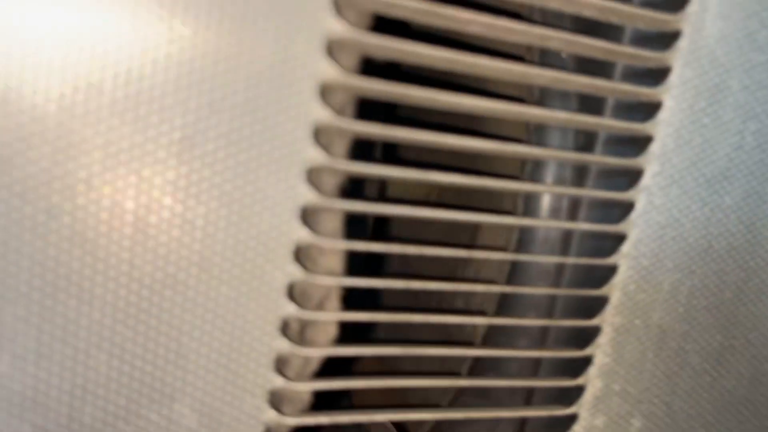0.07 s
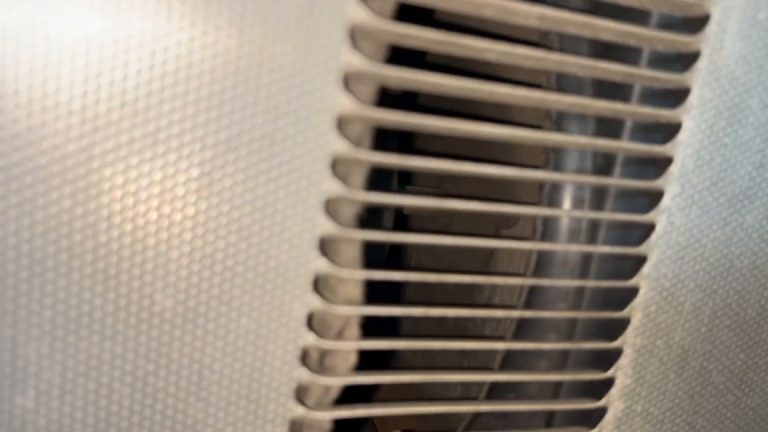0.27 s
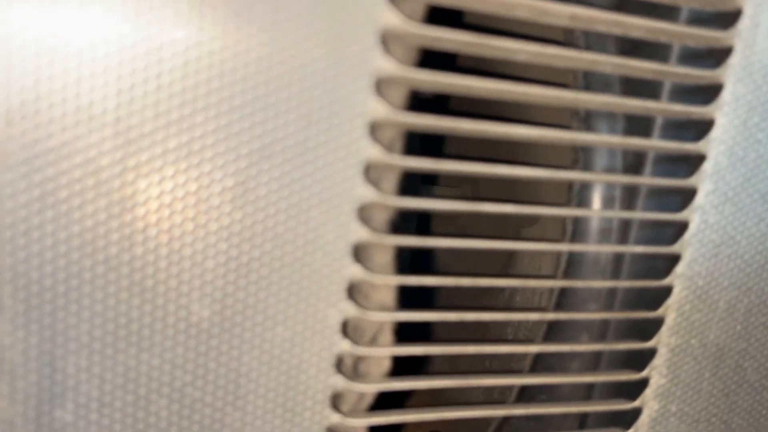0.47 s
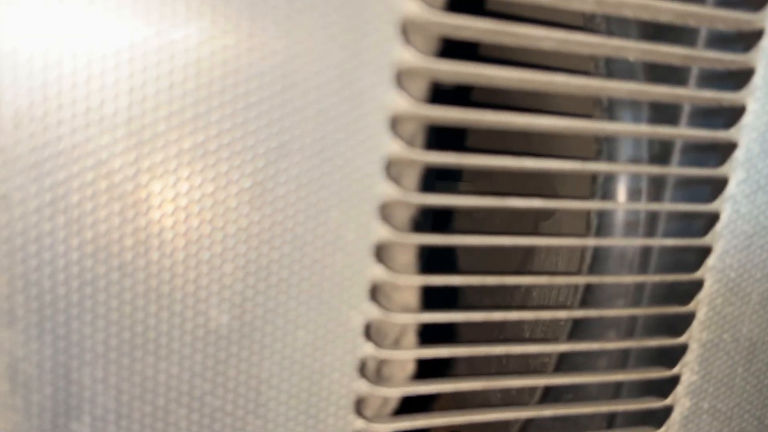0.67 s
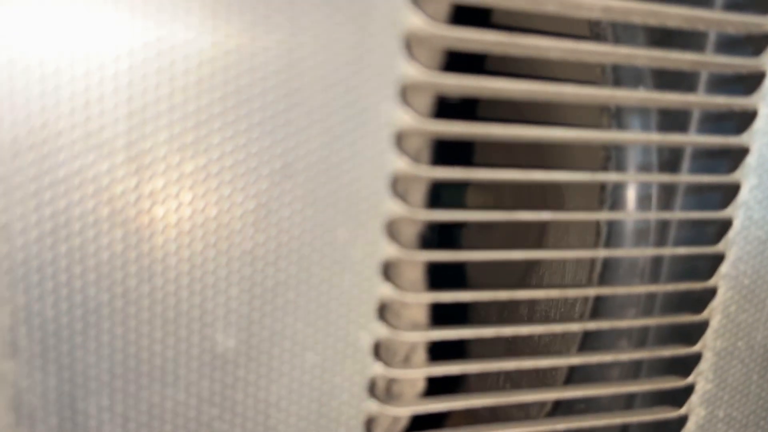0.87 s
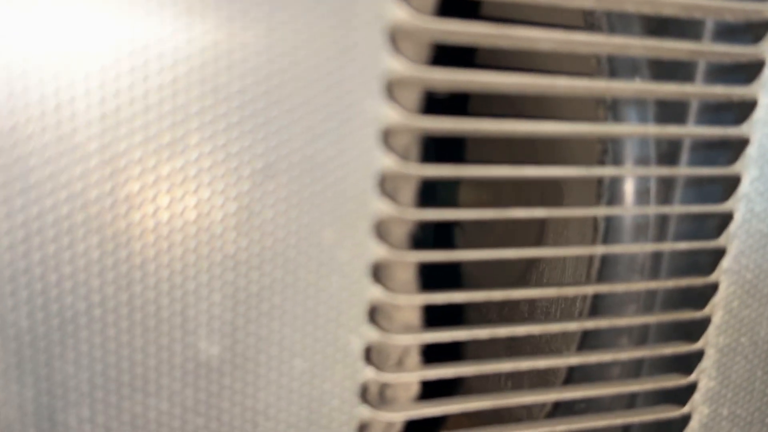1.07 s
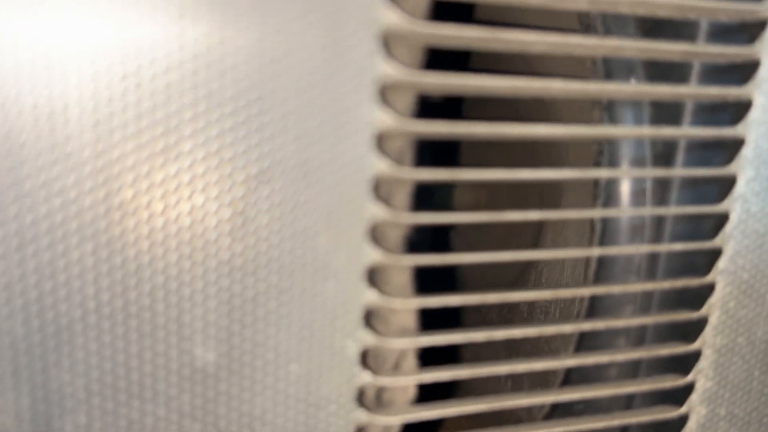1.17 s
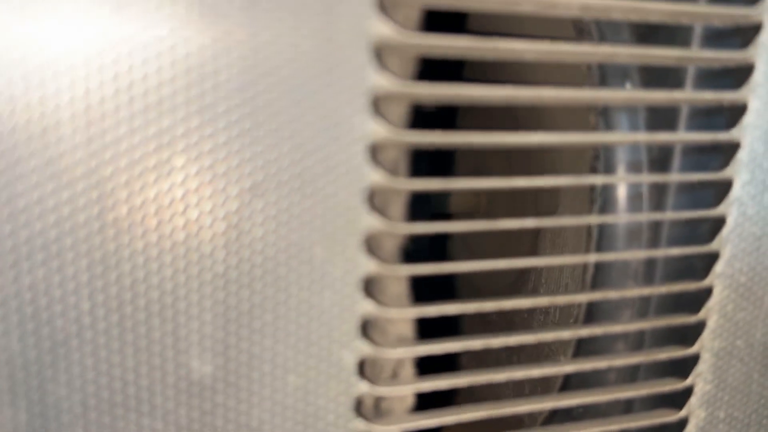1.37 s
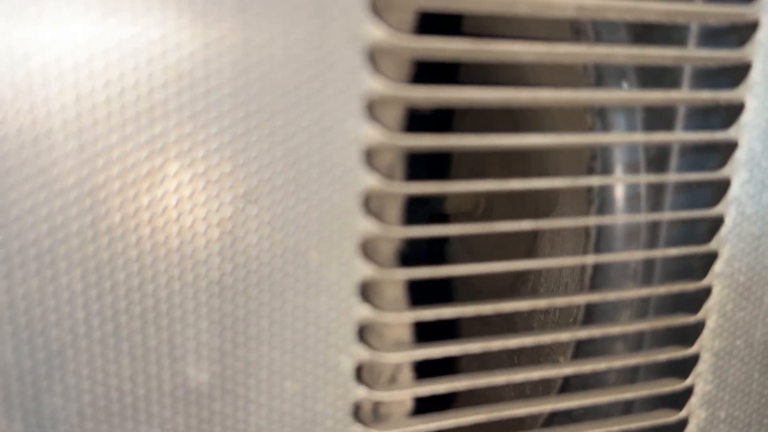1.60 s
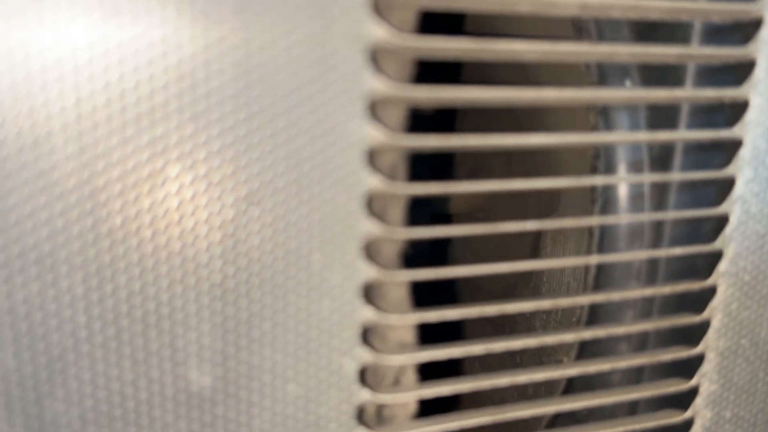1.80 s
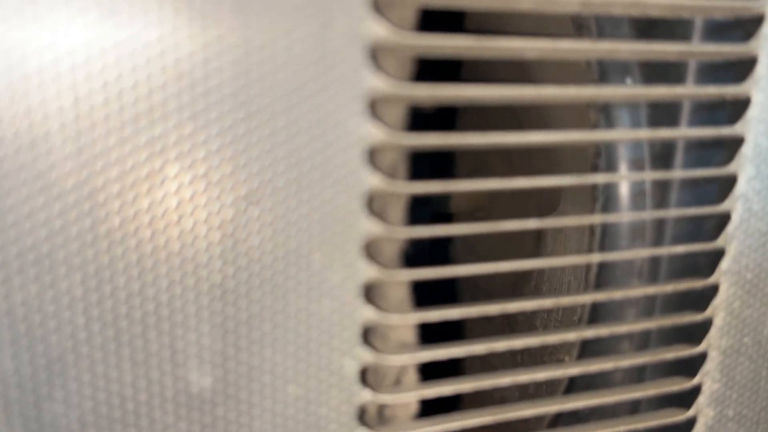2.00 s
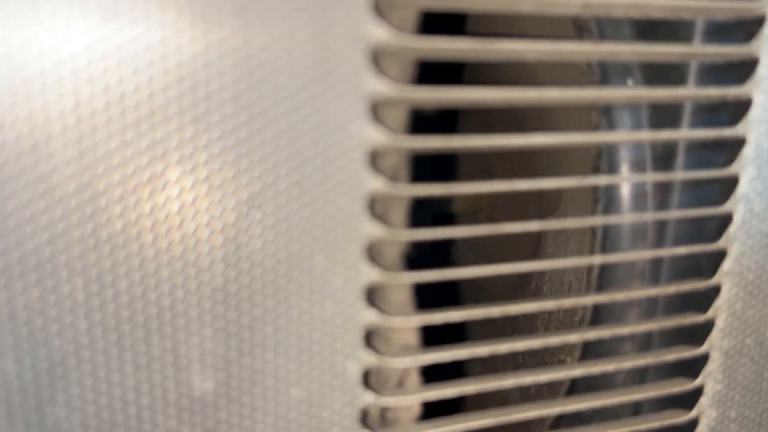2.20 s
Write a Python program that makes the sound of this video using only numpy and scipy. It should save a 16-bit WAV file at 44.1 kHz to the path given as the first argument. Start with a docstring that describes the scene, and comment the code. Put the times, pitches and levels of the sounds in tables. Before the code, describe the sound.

Close to an air conditioner in a small room, a humming rush of air swells and hisses through the vent slots. One sharp switch clunk follows with a short echo, and the airflow fades away.

```python
"""An air conditioner's blower spins up close by and pushes air out through its grille.
The air rumbles in the fan housing, roars and puffs in the duct, makes the cabinet hum
and hisses through the slots. A switch clunks as its contacts snap and knock a panel.
The small room rings briefly, and the fan winds down to a faint hiss."""
import sys
import numpy as np
from scipy import signal
from scipy.fft import rfft, irfft
from scipy.io import wavfile
from scipy.ndimage import uniform_filter1d

SR = 44100
rng = np.random.default_rng(int(sys.argv[2]) if len(sys.argv) > 2 else 0)


def master_out(mix):
    """Clip the mix to full scale and print it as 16-bit PCM to the path in sys.argv[1]."""
    frames = np.transpose(np.atleast_2d(mix))
    ceiling = np.clip(frames, -1, 1)
    pcm = np.round(ceiling * 32767).astype(np.int16)
    wavfile.write(sys.argv[1], SR, pcm)


N = 99225
TIME = np.arange(N) / SR

# How strongly the air flows: time_s, level_db
AIR_FLOW = [(0, -26), (.05, -25), (.14, -18), (.25, -9.5), (.36, -6), (.5, -1.5), (.7, 0), (1.0, 1),
            (1.27, 1.5), (1.37, -4.5), (1.5, -10), (1.62, -13.5), (1.85, -18.5), (2.05, -24), (2.25, -28)]
def blower(flutter_db=1.2, flutter_hz=45):
    """The fan moves the air; the same swirls make both the roar and the hiss flutter."""
    flow_db = curve(AIR_FLOW)
    swirl_db = flutter_db * resonance(0, flutter_hz)
    low_rush = housing_rumble() + duct_roar(flow_db, swirl_db) + cabinet_hum(flow_db) + duct_puffs()
    return low_rush + grille_hiss(swirl_db) + grille_fizz(flow_db)


# How the rumble rises and falls: time_s, level_db
RUMBLE_LEVEL = [(0, -24.5), (.1, -22), (.17, -11), (.25, -9.5), (.305, -13.5), (.355, -1), (.44, -0.5),
                (.49, 1), (.56, 0.5), (.66, -7), (.75, -0.5), (.96, 0.5), (1.12, 2), (1.27, -2), (1.47, -1),
                (1.53, -6.5), (1.79, -10.5), (1.84, -13.5), (2.02, -15.5), (2.055, -10.5), (2.09, -18.5),
                (2.25, -21.5)]
# The rumble's tone, or how strong each pitch is: pitch_hz, level_db
RUMBLE_TONE = [(20, -46), (35, -40), (48, -13), (62, -1.5), (84, 1.5), (125, -1), (175, -0.5), (230, -7.5),
               (340, -13.5), (900, -60.5)]
def housing_rumble(gain_db=-29):
    """Air beats against the fan housing and makes a low rumble."""
    return amp(gain_db + curve(RUMBLE_LEVEL)) * steady(noise(RUMBLE_TONE))


# The roar's tone: pitch_hz, level_db
ROAR_TONE = [(40, -43), (110, -12), (185, -1.5), (235, -4.5), (285, -1.5), (335, -11.5), (420, -8.5),
             (470, -5.5), (540, -2.5), (620, -1.5), (700, -11.5), (800, -11.5), (865, -7), (1120, -11),
             (1250, -14), (1400, -22), (2000, -34.5), (5000, -72)]
def duct_roar(flow_db, swirl_db, gain_db=-26):
    """Swirling air roars in the duct, louder as the flow grows."""
    return amp(gain_db + flow_db + swirl_db) * noise(ROAR_TONE)


# Pitches the cabinet rings at: pitch_hz, width_hz, level_db, loudest_s, swell_s
CABINET_RINGS = [(142, 34, -33.5, 0.98, 0.17), (170.4, 11.6, -29, 0.833, 0.15), (184, 27, -30, 1.303, 0.15),
                 (254.6, 24.4, -32.5, 1.13, 0.23), (426, 81, -35.5, 1.47, 0.55),
                 (544, 37, -35.5, 1.156, .17), (613, 54, -37.5, 0.71, 0.2), (866, 30, -41, 0.7, 0.16),
                 (960, 56, -39, 0.67, 0.96), (1029, 34, -41.5, 1, 0.4), (1134, 32, -38.5, .8, 0.26)]
def cabinet_hum(flow_db):
    """The cabinet hums with the flow; each pitch swells as the listener moves past it."""
    return amp(flow_db) * sum(amp(db) * swell(loudest_s, swell_s) * steady(resonance(hz, width_hz))
                              for hz, width_hz, db, loudest_s, swell_s in CABINET_RINGS)


# Single puffs of air: start_s, level_db, fade_s
AIR_PUFFS = [(0.031, -39.5, 0.046), (0.078, -36.5, 0.041), (0.337, -25, 0.014), (0.846, -27, 0.019),
             (0.986, -25.5, 0.037), (1.09, -21.5, .022), (1.176, -28, 0.017), (1.237, -19.5, 0.022),
             (1.574, -28, 0.017)]
# The tone they share: pitch_hz, level_db
PUFF_TONE = [(50, -31), (120, -13), (185, 3.5), (260, 1.5), (380, -6), (550, -1.5), (640, -14.5),
             (800, -31), (2000, -49), (8000, -100)]
def duct_puffs(rise_s=0.0035):
    """Separate puffs of air thump softly in the duct."""
    loudness = sum(amp(db) * burst(start_s, fade_s, rise_s) for start_s, db, fade_s in AIR_PUFFS)
    return loudness * steady(noise(PUFF_TONE))


# How the grille's hiss rises and falls: time_s, level_db
GRILLE_LEVEL = [(0, -13.5), (.07, -34), (.16, -19), (.28, -9.5), (.45, -2.5), (.63, 1.5), (.85, -.5),
                (1.2, 0.5), (1.33, -1), (1.48, -15.5), (1.58, -14), (1.75, -21), (2.0, -23.5), (2.25, -41)]
# The tone of that hiss: pitch_hz, level_db
GRILLE_TONE = [(300, -4), (1200, -0.5), (1600, -2), (1900, -3.5), (2300, -2), (2900, -6), (4300, -8),
               (5500, -11.5), (7200, -15), (8000, -19.5), (9500, -29), (11500, -33), (16000, -42)]
# Pitches the slots ring at: pitch_hz, width_hz, level_db
SLOT_RINGS = [(1710, 160, -51.5), (2053, 82, -58.5), (2560, 160, -55.5), (3160, 110, -57.5),
              (3790, 230, -60), (4935, 80, -63.5)]
def grille_hiss(swirl_db, hiss_db=-44):
    """Air hisses through the slots and makes them ring."""
    slots = sum(amp(db) * resonance(hz, width_hz) for hz, width_hz, db in SLOT_RINGS)
    hiss = amp(hiss_db) * noise(GRILLE_TONE)
    return amp(curve(GRILLE_LEVEL) + 0.5 * swirl_db) * (hiss + slots)


# The tone of the finest, highest hiss: pitch_hz, level_db
FIZZ_TONE = [(3000, -22), (7700, -2), (8700, 6), (10000, 0.5), (10800, -2), (12800, -2), (13700, 0),
             (16000, -11)]
def grille_fizz(flow_db, gain_db=-63):
    """Air fizzes in the grille only at full flow: it gains 2 dB for each dB of flow."""
    return amp(gain_db + 2 * flow_db) * noise(FIZZ_TONE)


# The contacts hitting home: start_s, level_db, fade_s
CONTACT_HITS = [(1.3966, -48, 0.0015), (1.398, -26.5, 0.0023), (1.399, -36, 0.002)]
# The tone of their snap: pitch_hz, level_db
SNAP_TONE = [(100, -22), (1000, -7), (3000, -4), (6000, -2), (7500, -11), (10000, 1), (12500, -1.5),
             (14200, -7), (16000, -11)]
def switch_snap(rise_s=0.00048):
    """The switch's contacts hit so close together that they make one bright snap."""
    loudness = sum(amp(db) * burst(start_s, fade_s, rise_s) for start_s, db, fade_s in CONTACT_HITS)
    return loudness * noise(SNAP_TONE)


KNOCK_S = 1.3995
# The tone of the knock on the panel: pitch_hz, level_db
KNOCK_TONE = [(40, -30), (100, 7), (300, -2), (700, -23), (1000, 6), (1400, 3.5), (2400, -2), (3200, -2.5),
              (4000, -3), (4700, -5), (6000, -9.5), (8000, -12), (16000, -32)]
# Pitches the panel rings at: pitch_hz, level_db, ring_s (time to fade by 60 dB)
PANEL_RINGS = [(995, -22.5, 0.07), (1584, -36.5, 0.1), (2320, -36, 0.11), (2600, -28.5, 0.022),
               (2765, -39.5, 0.16), (3520, -34.5, .07), (3920, -30, 0.027), (4500, -25, 0.026),
               (6700, -32, .025), (9860, -30, 0.023)]
def panel_clunk(knock_db=-22, push_db=-14.5, push_s=1.3993, push_width_s=0.0019):
    """The switch knocks a panel, which bends, pushes the air once and rings."""
    knock = amp(knock_db) * noise(KNOCK_TONE) * burst(KNOCK_S, fade_s=0.0043, rise_s=0.00068)
    push_shape = 1 - 2 * ((TIME - push_s) / push_width_s) ** 2
    push = amp(push_db) * push_shape * swell(push_s, push_width_s)
    ring = np.zeros(N)
    for hz, db, ring_s in PANEL_RINGS:
        loudness = amp(db) * burst(KNOCK_S, fade_s=ring_s / np.log(1000), rise_s=0.0015)
        ring += loudness * np.sin(2 * np.pi * (hz * TIME + rng.random()))
    return knock + push + ring


# The tone of the room's echo: pitch_hz, level_db
ECHO_TONE = [(40, -32), (100, -13), (300, 10.5), (550, 13), (750, 8), (1000, -1), (1600, 5.5), (1950, -0.5),
             (2650, 4.5), (3200, -4), (3550, 1), (3900, -1.5), (4600, 1.5), (5400, -5.5), (6000, -1),
             (7400, -7), (8300, -8), (10500, -5), (11000, -8), (12200, -5), (13200, -10), (14200, -3),
             (16000, -18)]
# How long the echo takes to fade by 60 dB: pitch_hz, ring_s
ROOM_RING_TIMES = [(100, 0.94), (1000, 0.39), (4000, 0.38), (8000, .31), (12000, 0.26), (16000, 0.24)]
def room_echo(gain_db=-31, rise_s=0.0049):
    """The clunk bounces around the room in a quick blur; the high pitches die first."""
    hz, time_s, bands = signal.stft(noise(ECHO_TONE), SR, nperseg=256)
    fade_db = -60 * np.maximum(time_s - KNOCK_S, 0) / at_pitch(ROOM_RING_TIMES, hz)[:, None]
    tail = signal.istft(bands * amp(fade_db), SR)[1][:N]
    return amp(gain_db) * tail * np.clip((TIME - KNOCK_S) / rise_s, 0, 1)


# How the background hiss rises and falls: time_s, level_db
BACKGROUND_LEVEL = [(0, 5.5), (.08, 1), (.2, -0.5), (1.6, -7), (1.72, -3.5), (1.85, 2.5), (2.1, 1.5),
                    (2.25, -1)]
# Its tone: pitch_hz, level_db
BACKGROUND_TONE = [(30, -8), (200, 6), (1500, 2), (2700, -4.5), (3200, -11), (3450, -7.5), (3900, -8.5),
                   (4900, -1), (5600, -5), (6500, -0.5), (7500, -2.5), (8300, -18), (9300, -24),
                   (12400, -25), (13600, -12), (14600, -10), (16000, -13)]
def background_hiss(gain_db=-62):
    """A faint hiss lies under everything."""
    return amp(gain_db + curve(BACKGROUND_LEVEL)) * noise(BACKGROUND_TONE)


def amp(db):
    """Turns decibels into a number to multiply by."""
    return 10 ** (np.asarray(db) / 20)


def unit(x):
    """Scales a sound to an average strength (rms) of 1."""
    return x / np.sqrt(np.mean(x ** 2) + 1e-20)


def curve(points):
    """Joins points in time with straight lines."""
    return np.interp(TIME, *np.transpose(points))


def at_pitch(points, hz):
    """Looks up a table by pitch, with octaves evenly spaced."""
    pitches, values = np.transpose(points)
    return np.interp(np.log(hz + 1), np.log(pitches + 1), values)


def noise(tone):
    """Noise of strength 1 with the given tone."""
    gains = amp(at_pitch(tone, np.fft.rfftfreq(N, 1 / SR)))
    return unit(irfft(rfft(rng.standard_normal(N)) * gains, N))


def resonance(hz, width_hz):
    """Noise of strength 1 that rings around one pitch."""
    detune = (np.fft.rfftfreq(N, 1 / SR) - hz) / width_hz
    return unit(irfft(rfft(rng.standard_normal(N)) / (1 + 1j * detune) ** 2, N))


def burst(start_s, fade_s, rise_s):
    """A quick rise, then a fall to about a third every fade_s."""
    age_s = np.maximum(TIME - start_s, 0)
    return np.minimum(age_s / rise_s, 1) * np.exp(-age_s / fade_s)


def swell(peak_s, width_s):
    """A bell-shaped rise and fall."""
    return np.exp(-((TIME - peak_s) / width_s) ** 2)


def steady(x, window_s=0.087):
    """Evens out a noise's slow swells and keeps its quick flutter."""
    window = int(window_s * SR)
    power = uniform_filter1d(uniform_filter1d(x ** 2, window), window)
    return unit(x / np.sqrt(np.abs(power) + 1e-9))


def scene():
    """Adds the blower, the switch's clunk, its echo and the background in one channel."""
    return (blower() + switch_snap() + panel_clunk() + room_echo() + background_hiss())[None]


def record(dry):
    """Cuts away the very highest pitches."""
    cutoff_hz = 15780
    low_pass = signal.firwin(801, cutoff_hz, window=("kaiser", 9), fs=SR)
    return signal.oaconvolve(dry, low_pass[None], "same")


dry = scene()
out = record(dry)
master_out(out)
```